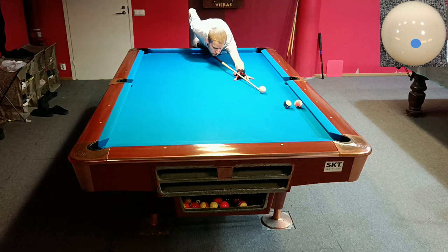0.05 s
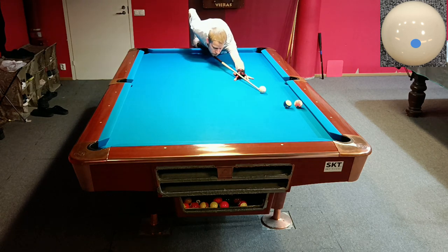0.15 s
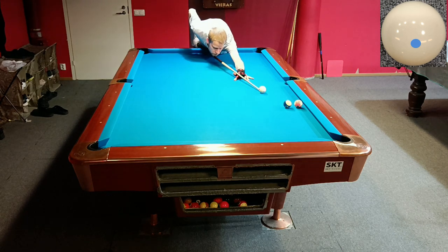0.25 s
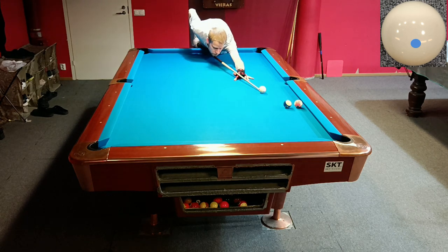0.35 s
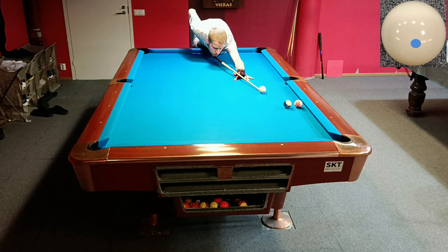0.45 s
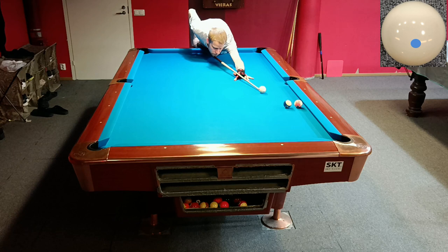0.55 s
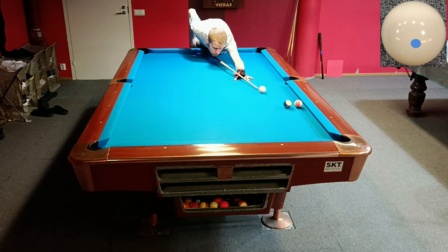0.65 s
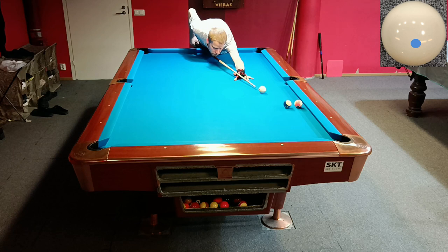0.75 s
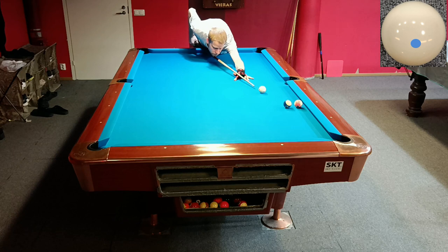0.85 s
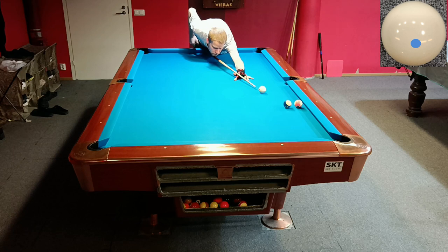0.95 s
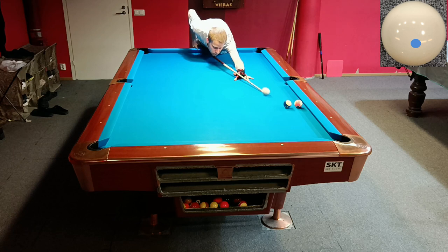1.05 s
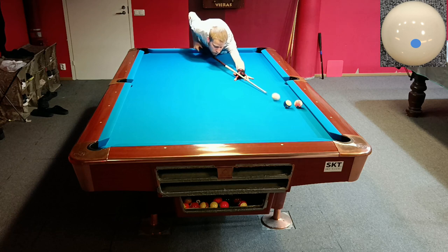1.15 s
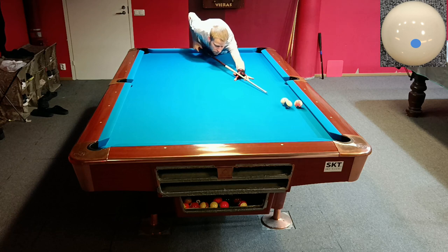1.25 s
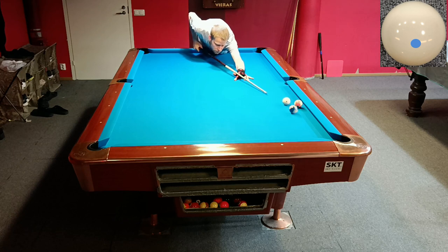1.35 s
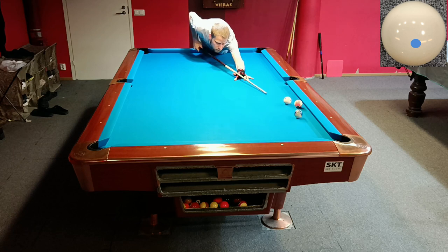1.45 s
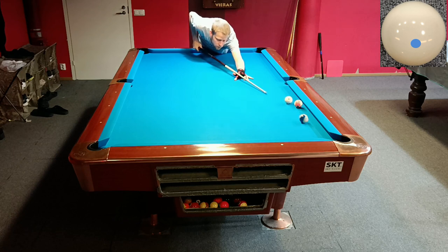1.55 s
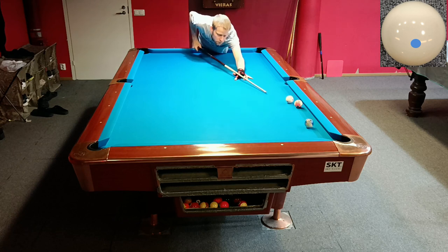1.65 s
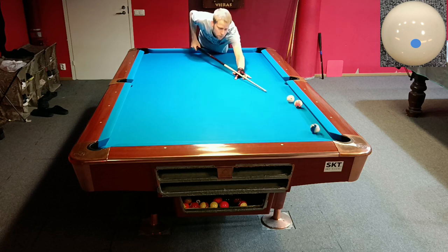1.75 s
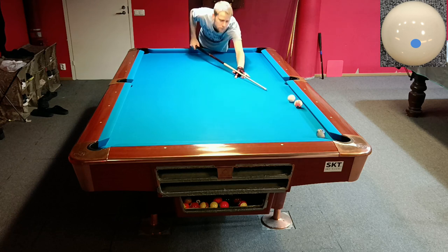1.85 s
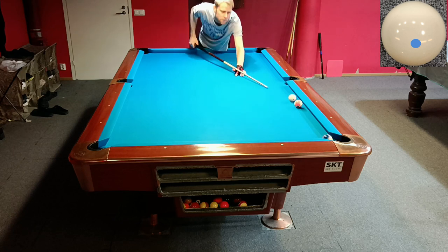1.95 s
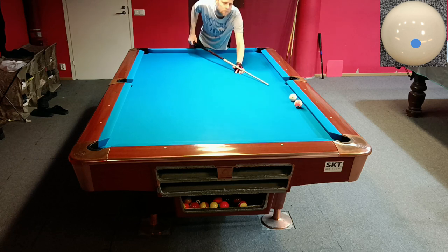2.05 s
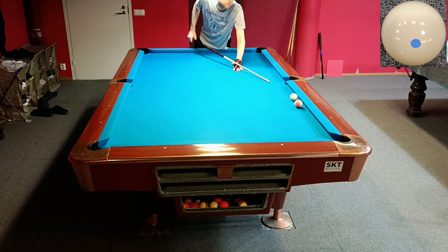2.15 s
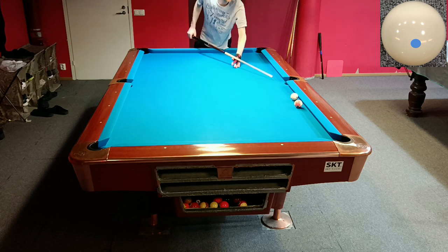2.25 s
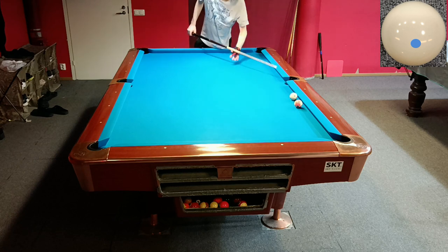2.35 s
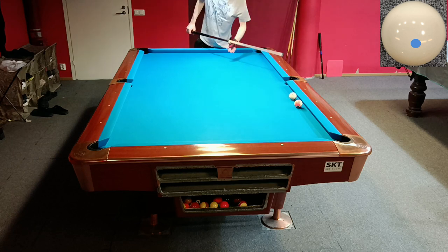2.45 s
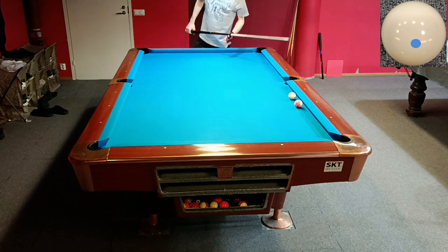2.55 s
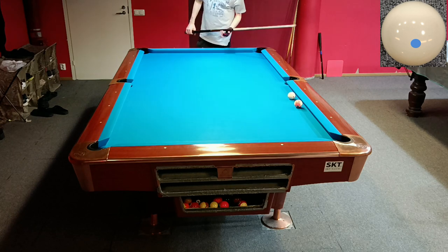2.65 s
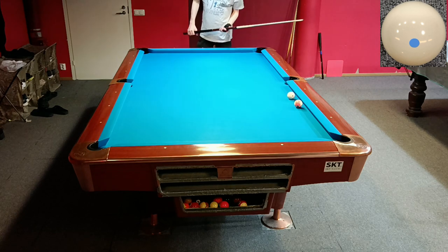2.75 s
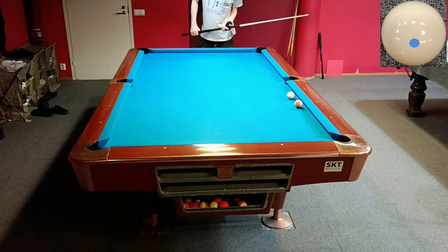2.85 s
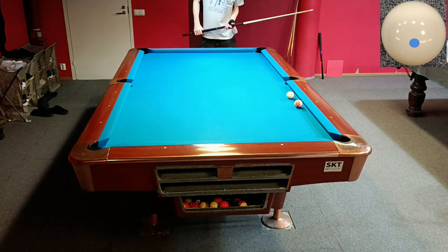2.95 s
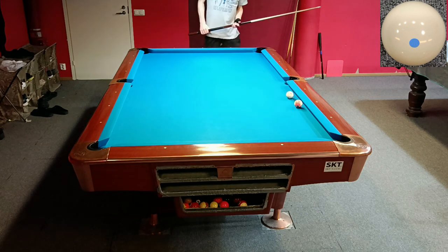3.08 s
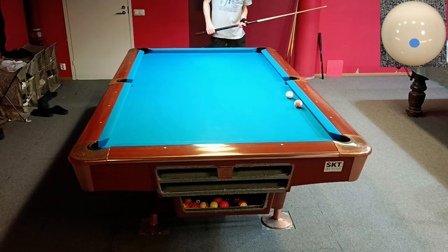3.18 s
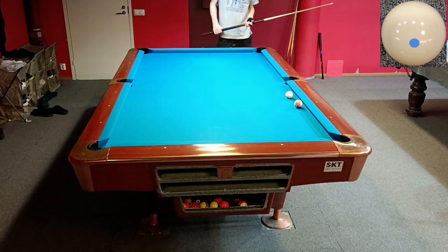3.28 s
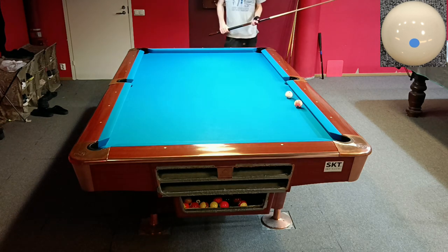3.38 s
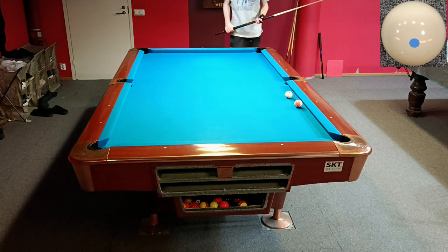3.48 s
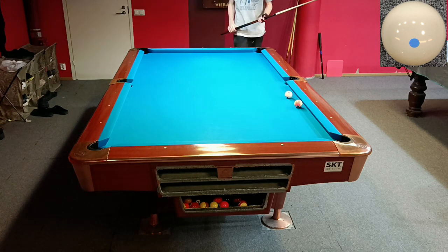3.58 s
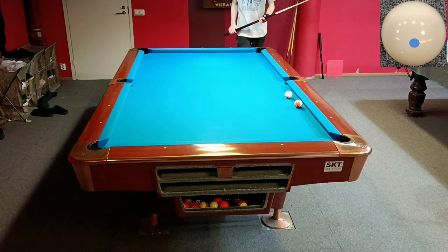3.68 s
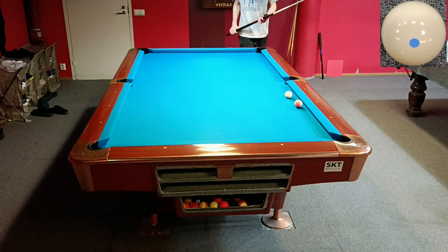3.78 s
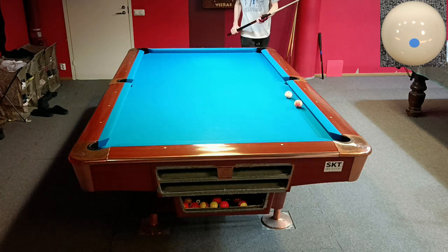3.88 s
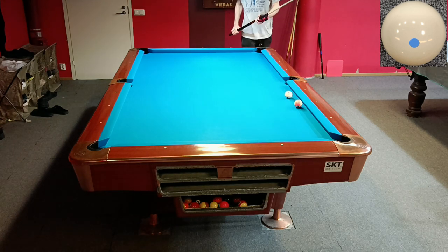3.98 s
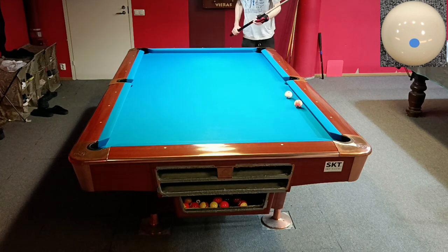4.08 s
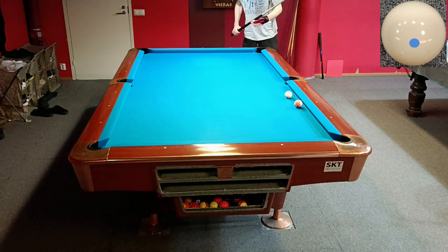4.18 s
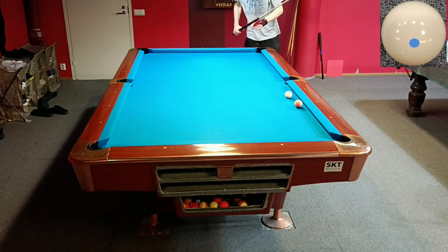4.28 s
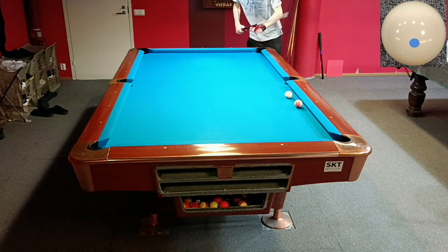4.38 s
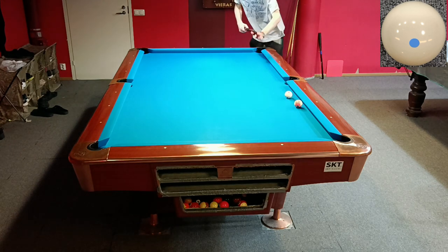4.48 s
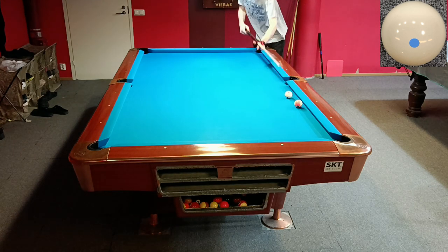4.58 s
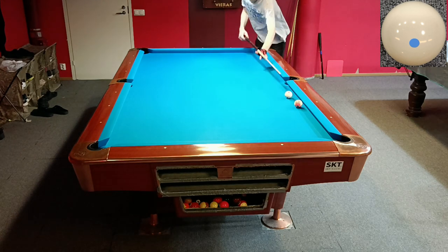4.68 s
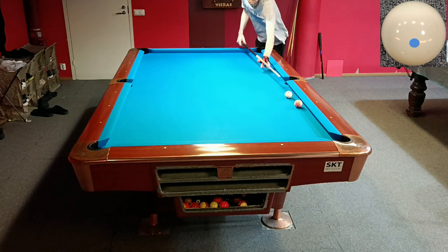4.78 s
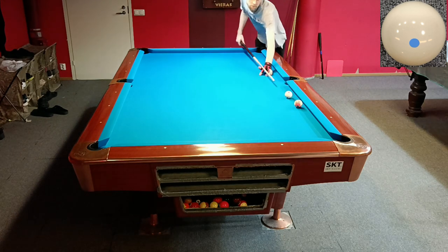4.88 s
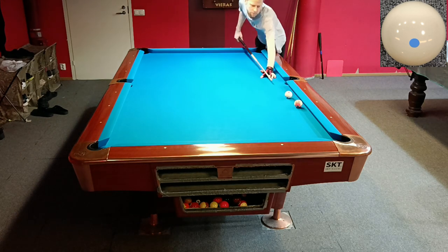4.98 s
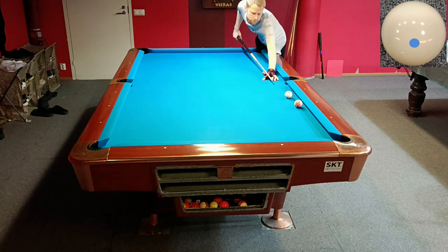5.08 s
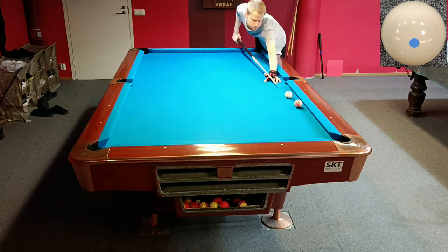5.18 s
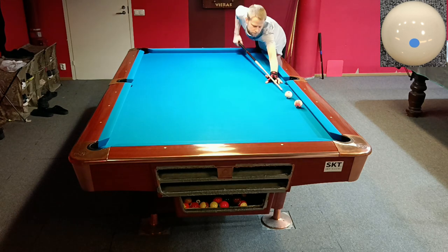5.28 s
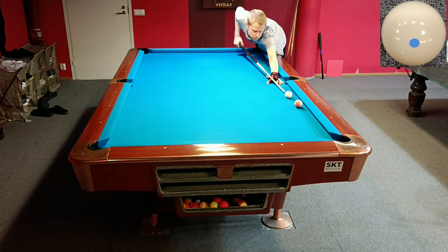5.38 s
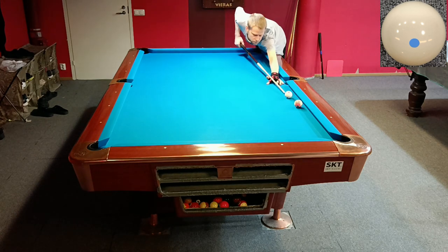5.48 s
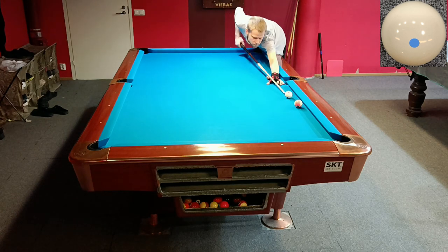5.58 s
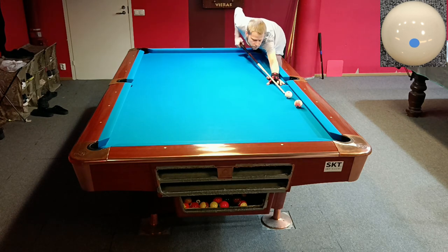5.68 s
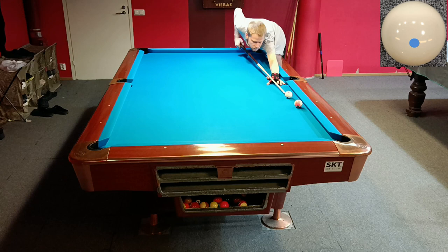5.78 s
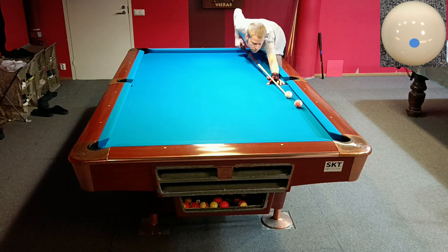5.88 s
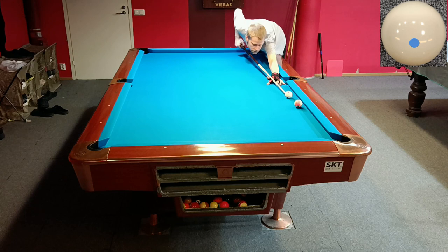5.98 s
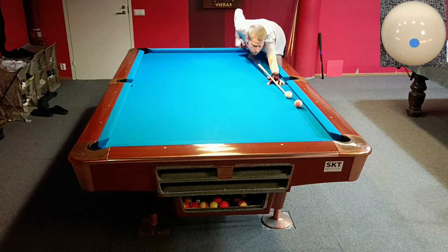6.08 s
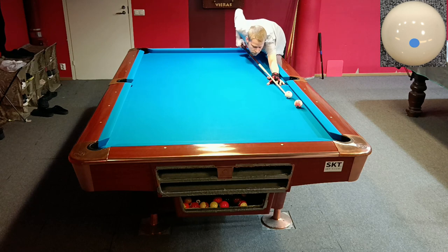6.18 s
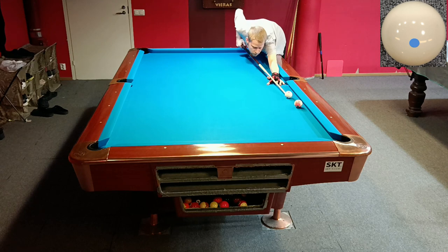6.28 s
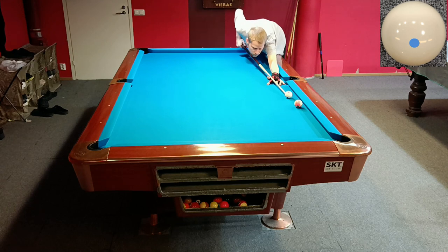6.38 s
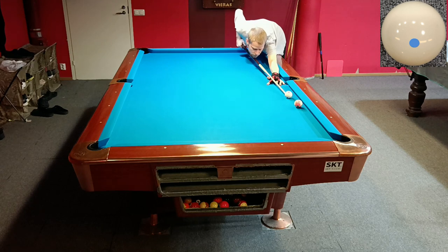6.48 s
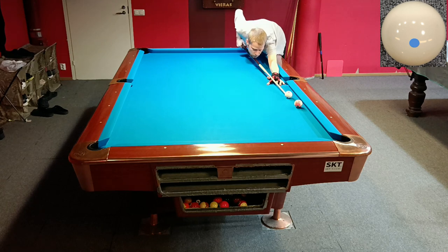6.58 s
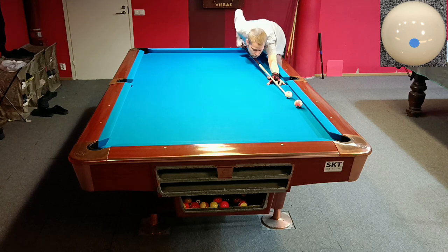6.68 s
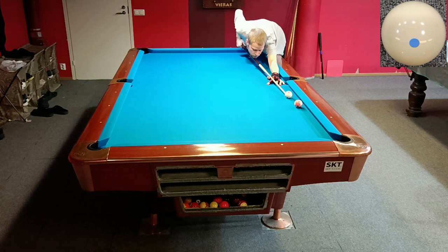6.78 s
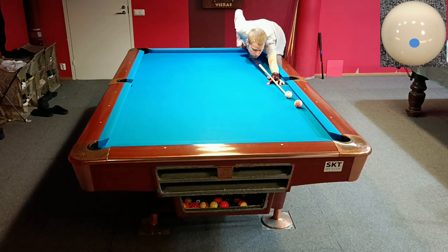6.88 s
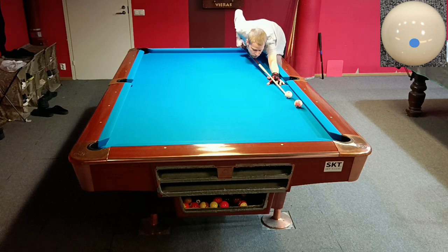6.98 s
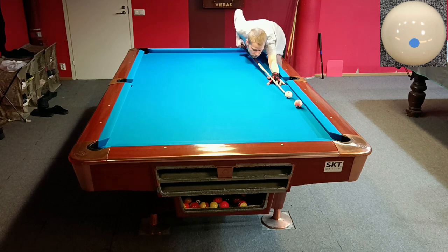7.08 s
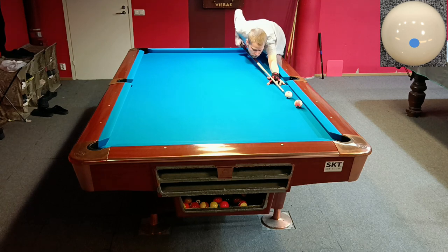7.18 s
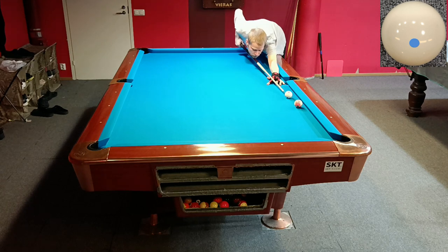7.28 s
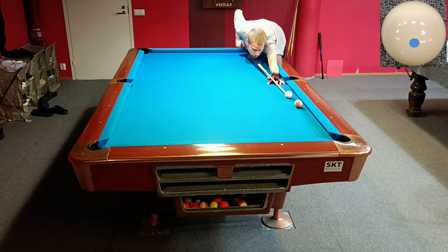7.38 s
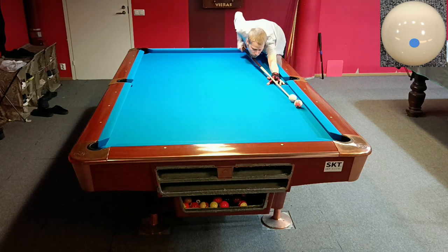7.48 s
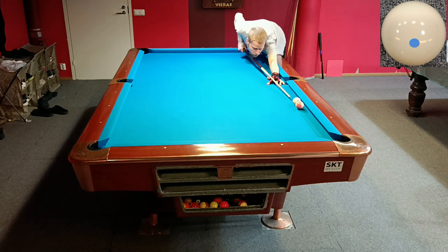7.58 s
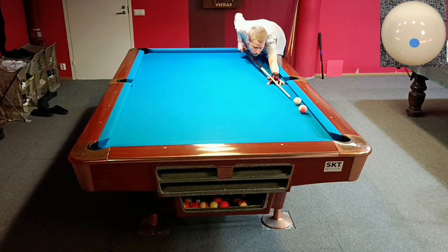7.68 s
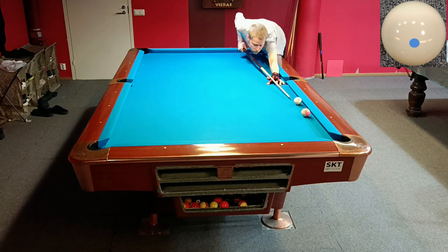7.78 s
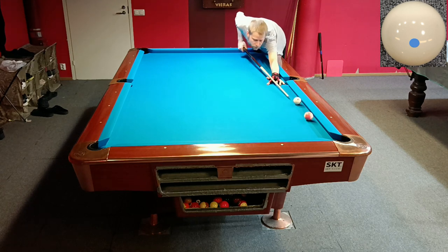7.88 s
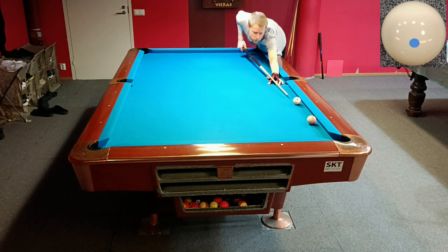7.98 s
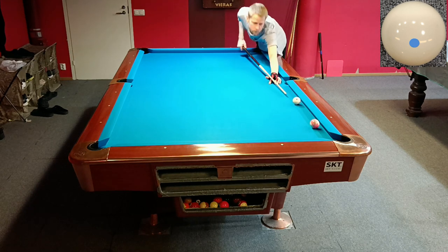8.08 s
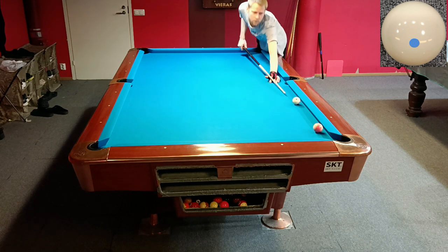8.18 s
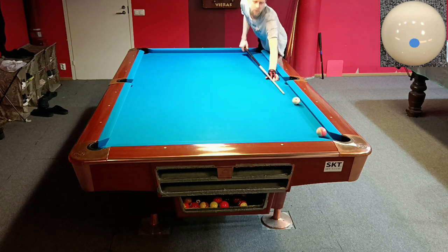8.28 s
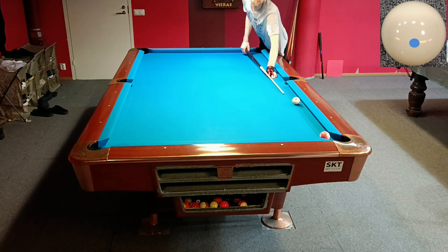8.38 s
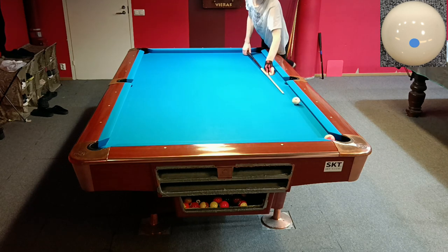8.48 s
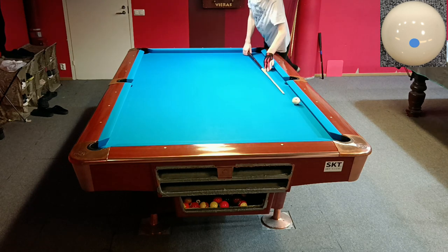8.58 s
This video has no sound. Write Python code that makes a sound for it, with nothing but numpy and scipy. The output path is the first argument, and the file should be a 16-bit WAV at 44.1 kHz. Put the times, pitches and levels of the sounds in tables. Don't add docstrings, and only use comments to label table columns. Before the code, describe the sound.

Two soft pool shots in a carpeted room: cue thud, sharp ball clack, a ball dropping and rumbling down a wooden channel, over ventilation hum.

```python
import sys
import numpy as np
from scipy import signal
from scipy.fft import rfft, irfft
from scipy.io import wavfile
from scipy.ndimage import uniform_filter1d

SR = 44100
rng = np.random.default_rng(int(sys.argv[2]) if len(sys.argv) > 2 else 0)


def natural_amplitude(level_db):
    exponent = np.asarray(level_db, float) / 20
    return 10 ** exponent


def transcribe(u):
    v = np.clip(np.atleast_2d(u).T, -1, 1)
    q = np.round(v * 32767).astype(np.int16)
    wavfile.write(sys.argv[1], SR, q)


N = 381465
T = np.arange(N) / SR

# frequency in Hz, density in dB per Hz.
AIR_SPECTRUM = [(25, -41), (48, -16), (110, 2), (157, 2.5), (185, -14), (229, 0), (400, -21), (700, -21),
                (1380, -29.5), (1890, -28), (3700, -37.5), (8000, -50), (12000, -49.5), (15600, -47.5)]
# frequency in Hz, level in dB.
WHINES = [(317.6, -87), (349.9, -85.5), (441.4, -86), (602.9, -96.5), (705.2, -87), (877.5, -90),
          (1001, -90), (1922, -95.5), (2638, -103), (10002, -113)]
# centre in seconds, length in seconds, pitch in Hz, level in dB.
SQUEAKS = [
    (0.38, 0.033, 1890, -72.5),
    (1.04, 0.029, 1890, -71),
    (5.618, 0.019, 1905, -73),
    (6.407, 0.071, 1844, -82.5),
    (6.633, 0.06, 1875, -82),
    (7.231, 0.033, 1940, -69.5),
]
# time in seconds, peak in dB, left minus right in dB, contact in ms.
TIP_BLOWS = [
    (1.097, -26.5, 4, 0.86),
    (7.49, -29.5, 2.5, 1.42),
]
# frequency in Hz, level in dB, t60 in seconds.
SHAFT_MODES = [(208, -16, .07), (410, -6, .09), (805, -1.5, .05), (1017, -4, .05), (1247, -6, .05),
               (1430, -8, .06), (1805, -6, .08), (2040, -5, .07), (2455, -13, .07), (2750, -16, .09),
               (3450, -24, .07), (4290, -22, .06), (4680, -26, .07)]
# time in seconds, peak in dB, left minus right in dB, contact in ms,
# sharpness of the contact edge in dB.
BALL_HITS = [
    (1.3231, -10.8, 2.2, .365, 0),
    (7.6292, -15.6, 2.2, .375, -9),
]
# start in seconds, length in seconds, then boards, deep boom and
# rattle in dB.
CHANNEL_RUNS = [(1.38, 0.09, -58.5, -61.5, -78), (2.053, 0.068, -44.5, -59, -68),
                (2.205, .11, -46, -43.5, -46), (2.492, 0.096, -36.5, -44.5, -50.5),
                (2.709, 0.063, -50.5, -45, -69), (2.907, 0.078, -30, -45.5, -42),
                (3.003, 0.079, -29.5, -45.5, -42.5), (3.087, 0.099, -31.5, -50.5, -38.5),
                (3.197, 0.1, -25, -50.5, -43), (3.364, 0.18, -43.5, -54.5, -65.5),
                (3.774, 0.14, -33, -52, -34), (8.573, 0.01, -47, -51.5, -72.5)]
# frequency in Hz, level in dB, t60 in seconds.
CABINET_MODES = [(65.5, 0.5, 0.46), (88, 4.5, 0.38), (103.6, -1.5, 0.48), (112.6, 8, 0.7),
                 (125, -7.5, 0.21), (139.6, 3.5, 0.19)]
# frequency in Hz, level in dB, t60 in seconds.
BOARD_MODES = [(126, -17, 0.36), (162.5, -10.5, 0.12), (252.5, 1.5, 0.18), (282, 0, 0.047),
               (207, -8.5, .13), (294.6, -2, 0.22), (357, 3, 0.11), (408.4, 5.5, 0.094), (464, -2.5, 0.15),
               (537, -5, 0.071), (578, -9.5, 0.035), (668.6, 0.5, 0.11), (682, 7, 0.099), (752, 3.5, 0.065),
               (1227, -2.5, 0.02), (1377, 1.5, 0.028)]
# time in seconds, peak in dB, contact in ms,
# crack in dB, sparkle in dB.
WOOD_BLOWS = [(1.384, -40.5, 2.5, -30, -53), (2.176, -22.5, 0.38, -8.5, -42),
              (2.501, -23.5, 0.24, -0.5, -20), (2.601, -28, 0.55, -10.5, -31),
              (2.906, -24, 0.59, -9, -52.5), (2.936, -19, 0.44, -24, -39.5), (2.976, -29, 0.82, -37, -44.5),
              (3.105, -23.5, 0.5, -10.5, -36), (3.128, -20.5, 0.83, -21.5, -40.5),
              (3.207, -24.5, 0.95, -15, -45.5), (3.751, -14.5, 0.73, -15, -36.5),
              (3.802, -28.5, 0.66, -23.5, -49), (3.846, -25, 0.7, -14, -42), (5.298, -41.5, 0.56, -1, -38),
              (5.318, -45, 0.8, -7.5, -48), (7.699, -50.5, 0.61, -5, -42.5)]
# start in seconds, rise in seconds, hold in seconds, fall in seconds, level in dB.
MOVEMENTS = [
    (1.539, 0.44, 0.067, 0.42, -71),
    (4.538, .04, 0.036, 0.036, -72),
    (4.631, 0.015, .05, .15, -71.5),
    (4.786, .05, .05, 0.047, -84.5),
    (4.897, 0.037, .04, 0.11, -72.5),
    (5.002, 0.061, 0.16, .6, -69),
    (7.941, 0.35, 0.1326, 0.51, -70),
]
# time in seconds, peak in dB, contact in ms.
POCKET_BLOWS = [
    (2.035, -37.5, 0.56),
    (2.05, -29.5, 0.4),
    (2.076, -39.5, 1.5),
    (8.533, -42.5, 1),
    (8.548, -34, 1.8),
    (8.582, -35, 2.34),
]
# frequency in Hz, level in dB, t60 in seconds.
POCKET_MODES = [(168, -25.5, 0.13), (244.2, 0.5, 0.2), (267.2, 6, 0.21), (332.8, -15, 0.27),
                (355.5, 2, 0.11), (463, -8.5, 0.086), (530, -9, 0.16), (628, -13, 0.1)]
# frequency in Hz, density in dB per Hz.
CLOTH_SPECTRUM = [(1500, -6), (2500, 5.5), (4000, -1), (6000, 0.5), (8000, -5), (11000, -10.5), (14000, -8),
                  (15600, -9.5), (18000, -16)]
# time in seconds, peak in dB, contact in ms, box pitch in Hz.
TRAY_HITS = [
    (3.885, -14.5, 0.41, 2530),
    (3.927, -26, 0.34, 1990),
    (4.009, -28, 0.39, 1750),
    (4.2787, -52.5, 0.46, 1705),
    (4.3233, -61, 0.61, 1597),
]
# time in seconds, peak in dB.
METAL_TICKS = [
    (4.5614, -63),
    (4.5904, -66),
    (4.6543, -62.5),
    (4.8334, -79),
    (4.9624, -68),
]
# frequency in Hz, level in dB, t60 in seconds.
METAL_MODES = [(2024, -8, .1), (2606, -7, .12), (3680, -2, .11), (4740, -9, .08), (5841, -6, .1),
               (6821, -8, .08), (7730, -6, .1)]
# start in seconds, length in seconds, first and last pitch in Hz,
# level in dB.
FINGER_PULLS = [
    (4.83, .08, 2410, 2290, -73),
    (4.93, .09, 1960, 1970, -70),
    (5.05, .17, 1680, 1320, -64),
]
# delay in ms, left gain, right gain.
FIRST_ECHOES = [(2.6, -.38, -.3), (5.2, .1, .12), (7.6, -.24, -.18), (11.2, -.2, -.16), (20.4, -.14, -.12),
                (22, -.12, -.18), (32.6, -.18, -.12)]
# t60 in seconds, left-right likeness 0-1, level in dB.
ROOM_OCTAVES = [(1, 1, -2.5), (0.66, 0.6, 1.5), (1, 0.4, -5.5), (0.6, .3, -0.5), (0.65, 0, -1),
                (0.52, 0, 3), (0.41, 0.4, 0.5), (0.25, 0.22, -7.5)]


def band(x, lo_hz, hi_hz, order=2):
    return signal.sosfilt(signal.butter(order, [lo_hz, min(hi_hz, .48 * SR)], "band", fs=SR, output="sos"), x)


def unit(x):
    return x / np.sqrt(np.mean(x ** 2))


def colour(points):
    hz, db = np.transpose(points)
    f = np.maximum(np.fft.rfftfreq(N, 1 / SR), 1)
    gain = natural_amplitude(np.interp(np.log(f), np.log(hz), db))
    return unit(irfft(rfft(rng.standard_normal(N)) * gain, N))


def wander(rate):
    k = int(SR / rate)
    held = np.repeat(rng.standard_normal(N // k + 1), k)
    return 2.2 * uniform_filter1d(uniform_filter1d(held, k), k)[:N]


def swell(start, rise, hold, fall, gain_db_per_s=0.):
    up = (T - start - rise) / max(rise, .005)
    down = (start + rise + hold - T) / max(fall, .005)
    ramp_db = 25 * np.clip(np.minimum(up, down), -5, 0)
    return natural_amplitude(ramp_db + gain_db_per_s * np.clip(T - start - rise, 0, hold))


def push(ms):
    t = np.arange(128) / SR
    return np.sin(np.pi * np.clip(t / (max(ms, .1) / 1000), 0, 1)) ** 1.5


def contact(ms, edge_db):
    f = np.fft.rfftfreq(512, 1 / SR)
    x = f * ms / 900
    late = np.exp(-2j * np.pi * f * (.003 - ms / 2000))
    radiation = x ** 3 / (1 + x ** 4) ** 2.08 + natural_amplitude(edge_db - 42.5) * x ** 0.85
    return irfft(-rfft(push(ms), 512) * late * radiation)


def ring(modes, share=0.73, scatter_db=0., length=.4):
    hz, db, t60 = np.transpose(modes)[:, :, None]
    t = np.arange(int(length * SR)) / SR
    weight = natural_amplitude(db + scatter_db * rng.standard_normal(db.shape)) * rng.choice([-1, 1], db.shape)
    return (weight * np.sin(2 * np.pi * hz * t) * 1000 ** (-t / (share * t60))).sum(axis=0)


def crowd(count, lo_hz, hi_hz, top_db, slope_db, t60):
    hz = lo_hz + (hi_hz - lo_hz) * rng.random(count) ** 1.5
    octaves = np.log2(hz / lo_hz)
    return list(zip(hz, top_db + slope_db * octaves, t60 * .65 ** octaves))


def crack(decay_s, lo_hz, hi_hz):
    t = np.arange(8192) / SR
    noise = band(rng.standard_normal((2, len(t))), lo_hz, hi_hz)
    return noise * (1 - np.exp(-t / 0.00077)) * np.exp(-t / decay_s)


def add(out, s, sound, db, pan_db):
    i = int(s * SR)
    sound = sound[..., :N - i] * natural_amplitude(db) / np.abs(sound).max()
    out[:, i:i + sound.shape[-1]] += sound * natural_amplitude(np.array([[pan_db], [-pan_db]]) / 2)


def rub():
    return unit(band(rng.standard_normal(N), 5, 70, order=1))


def air():
    mid, side = colour(AIR_SPECTRUM), colour(AIR_SPECTRUM)
    side = signal.sosfilt(signal.butter(1, 500, "high", fs=SR, output="sos"), side)
    noise = mid + 0.53 * side * np.array([[1], [-1]])
    noise = natural_amplitude(-62.5) * natural_amplitude(.4 * wander(4)) * noise * natural_amplitude(np.array([[.5], [-.5]]))
    whine = sum(natural_amplitude(db + 0.42 * wander(5.3)) * np.sqrt(2) * np.sin(2 * np.pi * hz * T) for hz, db in WHINES)
    return noise + whine


def squeaks():
    out, grip = np.zeros((2, N)), rub()
    for s, length, hz, db in SQUEAKS:
        bell = np.exp(-(2 * (T - s) / length) ** 2)
        out += natural_amplitude(db) * bell * (1 + .5 * grip) * np.sin(2 * np.pi * hz * T)
    return out


def taps():
    out = np.zeros((2, N))
    shaft_dbs, shaft_contacts_ms = (3, -6), (.16, .2)
    for (s, db, pan_db, ms), shaft_db, shaft_ms in zip(TIP_BLOWS, shaft_dbs, shaft_contacts_ms):
        thud = band(np.diff(np.pad(push(ms), (1, 600))), 259.8, 990, order=1)
        add(out, s, thud, db, pan_db)
        modes = SHAFT_MODES + crowd(count=150, lo_hz=351, hi_hz=9010, top_db=-15, slope_db=-4.5, t60=0.07)
        shaft = np.convolve(push(shaft_ms), ring(modes, share=0.78, scatter_db=-0.8, length=.25))
        add(out, s + 0.0038, shaft, db + shaft_db, pan_db)
        add(out, s + .002, crack(.03, 350, 1600), db - 8.5, pan_db)
        add(out, s + 0.0039, crack(.025, 1600, 2600), db - 16.5, pan_db)
        add(out, s + 0.0027, crack(0.03, 3000, 9000), db - 31, 0)
    return out


def clacks():
    out = np.zeros((2, N))
    for s, db, pan_db, ms, edge_db in BALL_HITS:
        add(out, s - .003, contact(ms, edge_db), db, pan_db)
        snap = band(np.arange(256) == 0, 6400, 18000)
        add(out, s - .0003, snap, db + 1.2 * edge_db - 26, 4)
    return out


def run_level(column, fade_s):
    attack_s, gain_db_per_s = 0.018, -0.5
    return sum(natural_amplitude(dbs[column]) * swell(s, attack_s, length, fade_s, gain_db_per_s)
               for s, length, *dbs in CHANNEL_RUNS)


def roll():
    boards, boom, rattle = run_level(0, 0.062), run_level(1, 0.22), run_level(2, 0.1)
    jolts = rng.standard_normal(N) * (rng.random(N) < 4000 / SR)
    jolts = jolts * natural_amplitude(1.5 * wander(30))
    upper = crowd(count=150, lo_hz=506.0, hi_hz=5400, top_db=0, slope_db=-14.0, t60=0.017)
    deep, body, thin = (signal.fftconvolve(jolts, ring(modes, share=0.3))[:N]
                        for modes in (CABINET_MODES, BOARD_MODES, upper))
    low = boom * unit(deep) + boards * unit(band(body, 140, 460))
    return low + rattle * natural_amplitude(-6.0) * unit(band(thin, 600, 1900))


def knocks():
    out = np.zeros((2, N))
    for s, db, ms, crack_db, sparkle_db in WOOD_BLOWS:
        modes = BOARD_MODES + crowd(count=90, lo_hz=450, hi_hz=6000, top_db=-9, slope_db=-3, t60=.07)
        wood = np.convolve(push(ms), ring(modes, share=1.1, scatter_db=2.5, length=.3))
        add(out, s, wood, db - 3.5, 2.5)
        thump = band(np.pad(push(ms), (0, 900)), 330, 1300, order=1)
        add(out, s, thump, db + 1, 2.5)
        add(out, s, crack(0.018, 570, 1900), db + crack_db, 1.2)
        add(out, s, crack(0.024, 3000, 13000), db + sparkle_db, 0)
    return out


def cloth():
    level = sum(natural_amplitude(db) * swell(*shape) for *shape, db in MOVEMENTS)
    sides = []
    for _ in range(2):
        hiss = natural_amplitude(0.61 * wander(45)) * colour(CLOTH_SPECTRUM)
        swish = natural_amplitude(3.5 + 1.7 * wander(21)) * unit(band(rng.standard_normal(N), 1150, 2500))
        sides.append(level * (hiss + swish))
    return np.array(sides)


def drops():
    out = np.zeros((2, N))
    for s, db, ms in POCKET_BLOWS:
        add(out, s, np.convolve(push(ms), ring(POCKET_MODES, scatter_db=.4)), db, 1.5)
        add(out, s, band(np.pad(push(0.58 * ms), (0, 900)), 500, 1100), db - 20, 1.5)
    return out


def tray():
    out, t = np.zeros((2, N)), np.arange(2048) / SR
    for s, db, ms, hz in TRAY_HITS:
        flutter = rng.standard_normal(len(t)) * (rng.random(len(t)) < .15) * np.exp(-t / 0.0075)
        flutter = band(flutter, .7 * hz, 1.25 * hz, order=1) * 2.5 + (t == 0)
        add(out, s - .003, band(np.convolve(contact(ms, 0), flutter), 900, 3100), db, 2)
        add(out, s, crack(.004, 5000, 16000), db - 37, 0)
    return out


def ticks():
    out = np.zeros((2, N))
    for s, db in METAL_TICKS:
        add(out, s, ring(METAL_MODES, scatter_db=2.5, length=.2), db + 2.5, 0)
    return out


def pulls():
    out, grip = np.zeros((2, N)), rub()
    for s, length, first_hz, last_hz, db in FINGER_PULLS:
        hz = np.interp(T, [s, s + length], [first_hz, last_hz])
        tone = np.sin(2 * np.pi * np.cumsum(hz) / SR)
        out += natural_amplitude(db) * swell(s - .02, 0.034, length, 0.057) * grip * tone
    return out


def room(fill_s=0.0089, late_db=-29.0):
    t = np.arange(SR) / SR
    tail = 0
    for k, (t60, alike, db) in enumerate(ROOM_OCTAVES):
        mid, side = band(rng.standard_normal((2, SR)), 64 * 2 ** k, 128 * 2 ** k)
        alike = np.clip(alike, 0, 1)
        stereo = np.sqrt(1 + alike) * mid + np.sqrt(1 - alike) * side * np.array([[1], [-1]])
        tail = tail + natural_amplitude(db) * stereo * 1000 ** (-t / t60)
    tail *= natural_amplitude(late_db) * (1 - np.exp(-t / fill_s))
    for ms, left, right in FIRST_ECHOES:
        tail[:, int(ms * SR / 1000)] += np.array([left, right])
    return tail


def scene():
    tap, clack, rumble, boxed = taps(), clacks(), roll(), tray()
    knock = knocks() + drops()
    small = squeaks() + cloth() + ticks() + pulls()
    send = clack.mean(axis=0) + natural_amplitude(-9.0) * boxed.mean(axis=0) + natural_amplitude(-4.0) * tap.mean(axis=0)
    send = send + natural_amplitude(-3.5) * knock.mean(axis=0) + natural_amplitude(-11) * rumble + natural_amplitude(-10) * small.mean(axis=0)
    wet = signal.fftconvolve(send[None], room(), axes=1)[:, :N]
    panned_rumble = natural_amplitude(np.array([[.6], [-.6]])) * rumble
    return clack + boxed + tap + knock + panned_rumble + small + wet + air()


def top_cut(x):
    return signal.sosfilt(signal.butter(12, 15760, fs=SR, output="sos"), x)


def record(dry):
    heard = signal.sosfilt(signal.butter(2, 55, "high", fs=SR, output="sos"), dry)
    return top_cut(heard)


dry = scene()
out = record(dry)
transcribe(out)
```